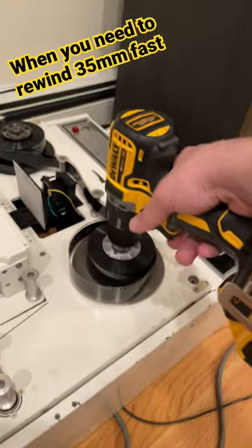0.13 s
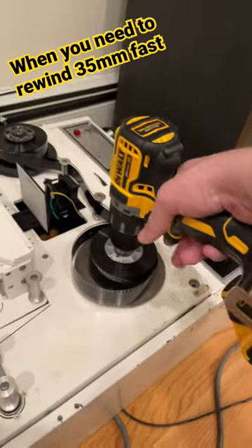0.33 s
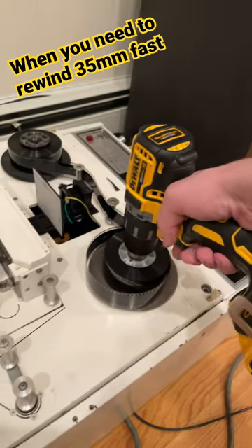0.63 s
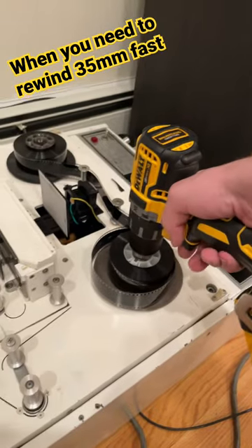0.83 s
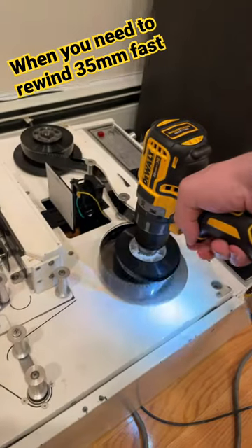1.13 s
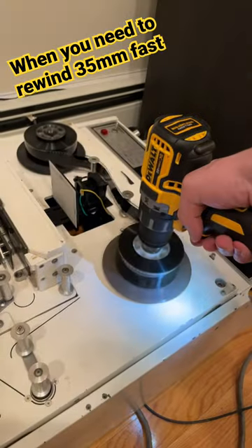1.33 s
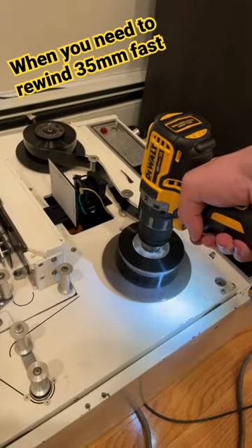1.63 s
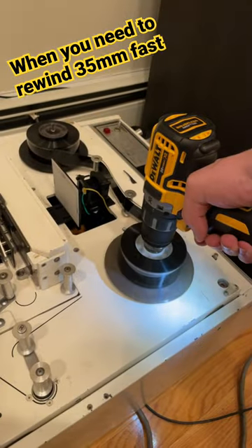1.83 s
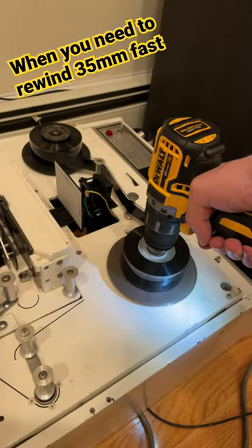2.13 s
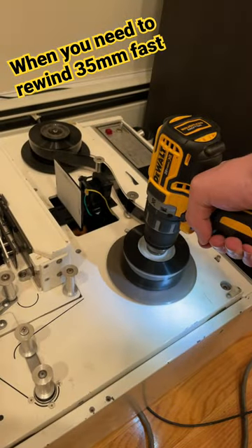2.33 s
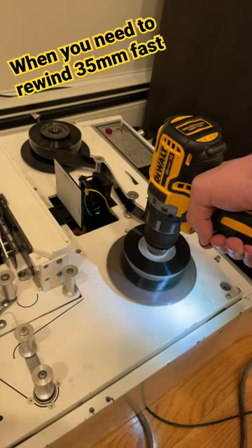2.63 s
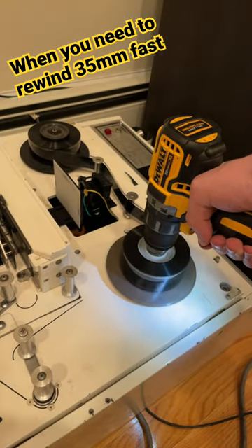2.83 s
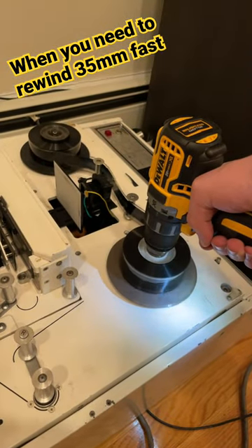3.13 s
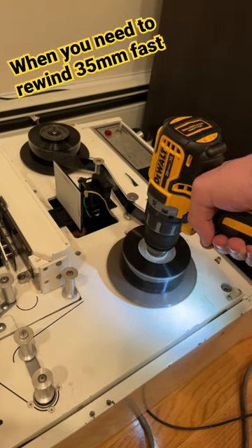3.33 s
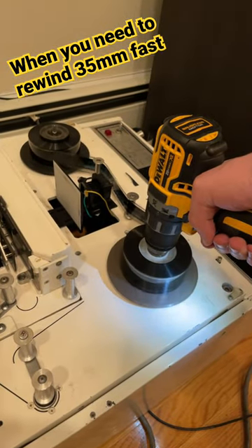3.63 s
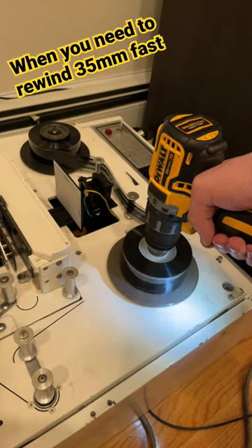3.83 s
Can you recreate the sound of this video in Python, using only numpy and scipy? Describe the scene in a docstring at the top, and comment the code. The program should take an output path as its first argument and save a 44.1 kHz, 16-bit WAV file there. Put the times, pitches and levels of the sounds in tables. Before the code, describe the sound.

Cordless drill close up indoors: soft handling ticks over low hum, then a low rattling whir with knocks and jerks, accelerating in steps to a shrill, steady whine that climbs again near the end.

```python
"""A quiet room with a metal table, where a cordless drill pressed onto a film spool is squeezed up to speed in steps.
First fingers shift on the grip, as noise rubs and ringing scratches, over appliance hum and soft room noise.
Then motor and gear orders whine as sines on the rotor speed, and gear teeth and fan air rattle in the housing.
Knocks ring the case, the load jerks in swells of low rumble, and the table top drones low for a second,
from the start through the slower speed steps.
"""
import sys
import numpy as np
from scipy import signal
from scipy.fft import rfft, irfft
from scipy.io import wavfile

SR = 44100
rng = np.random.default_rng(int(sys.argv[2]) if len(sys.argv) > 2 else 0)


def persist_wave(psi):
    """Save psi, clipped to +-1, as 16-bit WAV."""
    counts = np.round(np.clip(psi, -1, 1) * 32767).astype(np.int16)
    wavfile.write(sys.argv[1], SR, np.atleast_2d(counts).T)


def voltage_ratio(decibels):
    """Convert decibels (scalar or array-like) to amplitude ratios, 20 dB per decade."""
    exponent = np.asarray(decibels, float) / 20
    return 10 ** exponent


N = 176400

# Appliance hum: f/Hz, level/dB, waver/dB
HUM = [(56.8, -47, 0.2), (120, -67, -2.5), (238, -62.5, -1.5), (380, -76.5, 2.5)]
# Colour of the room noise: f/Hz, relative level/dB
ROOM_COLOUR = [(44, -27), (75, -4.5), (119, -6.5), (146, -21), (243, -12.5), (331, -22.5), (378, -21.5),
               (452, -24.5), (494, -20.5), (1070, -25), (1200, -24), (1670, -26), (1910, -26), (15000, -73)]
# Colour of the microphone hiss: f/Hz, relative level/dB
HISS_COLOUR = [(3000, -18), (5000, -15), (8000, -4), (10500, 5), (11800, -4), (13000, -30)]
# Small parts scratch: t/s, f/Hz, t60/s, level/dB
TICKS = [(.145, 4000, .03, -57), (.148, 2220, .03, -60), (0.189, 1600, .06, -50), (.186, 3160, 0.077, -61),
         (.218, 1500, .09, -56), (.342, 2200, .05, -58), (.43, 3500, 0.055, -60), (.452, 3450, .06, -61),
         (.457, 7700, .03, -60), (.5, 3500, .09, -67), (1.0725, 3820, 0.028, -53), (1.241, 10200, .03, -37)]
# Fingers rub on the grip: t/s of the peak, attack/s, decay/s, f/Hz, level/dB
FINGERS = [(.105, .012, .02, 11000, -74), (.112, .012, 0.025, 4352, -68), (.18, 0.0017, 0.028, 7600, -59),
           (.33, .015, 0.059, 3611, -67), (.44, .05, 0.051, 7407, -66.5), (.59, .01, .02, 7560, -82),
           (.814, .002, 0.026, 6360, -62.5), (1.02, .04, .03, 9000, -80), (1.073, .001, .01, 8000, -71)]
# The table top drones through the slower speed steps, one row: start/s, end/s, f/Hz, width/Hz, level/dB
TABLE_DRONE = 1.1, 2.1, 122.5, 8, -52.5
# The spool jerks, a dull rumble: t/s, decay/s, level/dB
JERKS = [(1.416, 0.035, -34.5), (1.47, 0.028, -38), (1.82, 0.055, -36), (2.203, 0.094, -39),
         (3.34, 0.053, -37)]
# Slack taken up with a knock: t/s, relative level/dB
KNOCKS = [(1.122, -33), (1.1317, -17), (1.2785, -33), (1.3078, -15.5), (1.3612, -10), (1.4472, -7),
          (1.467, -14), (1.4965, -6), (1.6618, -14), (1.8107, -4.5), (1.8185, -9), (1.8409, -17),
          (2.192, -7), (2.1962, -14), (2.2014, -11), (2.2194, -1), (2.263, -9), (2.282, -10), (2.302, -11)]
# Ringing modes of the case: f/Hz, relative level/dB, t60/s
CASE_MODES = [(1980, -32, .02), (2450, -24, .02), (3160, -5, 0.019), (3590, 3.5, 0.033), (3805, 2.5, 0.023),
              (4260, 1, 0.02), (6600, -21, .015), (7470, -3, 0.023)]
# Rotor speed through the trigger steps: t/s, speed/turns per s
SPEED = [(1.125, 44), (1.17, 49), (1.305, 50), (1.385, 71), (1.51, 73.8), (1.56, 75.6), (1.63, 76.2),
         (1.81, 75.4), (1.87, 115.7), (1.906, 118.3), (1.98, 120.5), (2.184, 120.6), (2.19, 150),
         (2.206, 183), (2.22, 194.5), (2.245, 200), (2.27, 209), (2.3, 214.5), (2.37, 218.5), (2.45, 220.9),
         (3.27, 220.9), (3.3, 224), (3.318, 233), (3.334, 248), (3.347, 263), (3.375, 279.5), (3.41, 286.5),
         (3.46, 290), (3.59, 290.8), (3.6, 294), (3.62, 313), (3.645, 328), (3.67, 336), (3.7, 340.5),
         (3.76, 342.8), (4, 343.3)]
# Effort of the gear rattle: t/s, relative level/dB, lift of lows and mids/dB
EFFORT = [(1.11, -81, 0), (1.12, -58, 2), (1.16, -43, -3), (1.3, -45.5, -3.5), (1.4, -36, -2),
          (1.42, -40.5, 0), (1.47, -34, -1.5), (1.58, -38.5, -0.5), (1.81, -35.5, -1), (1.82, -32, 0),
          (1.92, -33.5, 0), (2.1, -31.5, -1), (2.18, -33.5, 0.5), (2.2, -27, -3), (2.3, -26, 3.5),
          (2.3, -23.5, 0.5), (2.41, -26.5, 0), (2.78, -24, 1), (2.84, -26, 1), (3.27, -28.5, 1),
          (3.37, -24.5, 1.5), (3.83, -21.5, 0.5), (4.0, -22, 1)]
# Colour of the rattle at low and at high speed: f/Hz, relative level/dB per Hz
RATTLE_SLOW = [(150, -24.5), (250, -11), (341, -19.5), (385, -23), (980, -6.5), (1540, -6.5), (1920, -2.5),
               (2540, -3.5), (3230, -0.5), (4190, -2), (5520, -11), (7280, -5), (8650, -13), (12900, -24.5),
               (15600, -33)]
RATTLE_FAST = [(150, -31), (250, -22), (392, -22), (718, -12.5), (824, -20), (980, -9.5), (1430, -6),
               (1590, -8.5), (1960, -3.5), (2760, -5), (3180, -2), (5720, -8), (6680, -5.5), (9440, -9),
               (15600, -27)]
# Resonances of the housing: f/Hz, width/Hz, relative level/dB
HOUSING = [(824, 38, -2.5), (1230, 98, -24), (1430, 152, -1), (1955, 110, -2), (2460, 37, -38.5),
           (3186, 84, -1.5), (3470, 51, -14), (3940, 310, -11), (4186, 90, -3), (5200, 39, 2.5),
           (6400, 530, -7), (7100, 67, -12), (7260, 106, -4), (8060, 110, 0), (10200, 510, -9.5),
           (15300, 280, 0)]
# The loud whine: t/s, level/dB
WHINE = [(2.23, -29), (2.272, -31), (2.3, -19.5), (2.44, -14.5), (2.47, -19.5), (2.518, -11), (2.548, -19),
         (2.58, -12.5), (2.718, -14), (2.75, -11.5), (2.924, -15), (3.222, -15), (3.245, -18), (3.3, -13),
         (3.312, -18.5), (3.332, -11.5), (3.348, -24)]
# The wavering orders, with a weaker 16 under the loud whine: multiples of the rotor speed
ORDERS = [1, 3, 4, 5, 8, 9.16, 10, 12, 16, 20, 23, 30.88, 32, 46, 52]
# Speeds at which their levels are given: speed/turns per s
ORDER_SPEEDS = [50, 59, 74, 121, 170, 192, 221, 255, 290, 320, 343]
# One row per order, one column per entry of ORDER_SPEEDS: level/dB
ORDER_LEVELS = [(-73, -82, -63, -68, -57, -43, -49.5, -60, -44, -39, -41.5),
                (-67, -75, -57.5, -60, -55, -44, -50, -48, -44, -42, -36),
                (-60.5, -78, -61.5, -60.5, -68, -42, -40, -55, -33, -36, -34),
                (-83, -76, -65, -52.5, -55, -38, -55, -67, -38, -45, -40),
                (-66, -68, -68, -59, -53, -53, -39, -50, -40, -32, -32),
                (-75, -60, -64, -51, -45, -45, -54, -66, -36, -55, -32),
                (-64, -47, -56, -54, -48, -52, -50, -48, -44, -29, -29),
                (-69, -66, -52, -41.5, -38, -38, -30, -42, -52, -50, -40),
                (-77, -66, -46, -39, -37, -44, -45, -34, -32, -40, -33),
                (-81, -72, -56, -68, -40, -27, -45, -58, -58, -50, -35),
                (-85, -60, -67, -46, -22, -36, -37, -41, -26, -17.5, -23.5),
                (-71, -64, -58, -39, -48, -54, -36, -52, -44, -44, -52),
                (-59, -60, -50, -33, -50, -45, -59, -60, -46, -44, -50),
                (-60, -59, -55, -54, -52, -54, -47, -54, -45.5, -52, -56),
                (-65, -60, -33, -50, -60, -60, -62, -66, -66, -66, -66)]


def rms_one(x):
    """Scale to rms 1."""
    return x / np.sqrt(np.mean(x ** 2) + 1e-20)


def in_time(rows):
    """Draw the columns of a table as curves, sample by sample."""
    s, *columns = np.transpose(rows)
    return [np.interp(np.arange(N) / SR, s, c) for c in columns]


def colour(x, spectrum):
    """Filter white input to the spectrum, drawn over log frequency; rms 1."""
    hz, db = np.transpose(spectrum)
    f = np.maximum(np.arange(N // 2 + 1) * SR / N, 1)
    gain = voltage_ratio(np.interp(np.log(f), np.log(hz), db))
    return rms_one(irfft(rfft(x) * gain, N))


def drift(rate):
    """Slow random wandering, rms 1: noise through two poles at rate Hz."""
    r = np.exp(-80 * np.pi * rate / SR)  # one value every 40 samples
    white = rng.standard_normal(N // 40 + 2002)
    slow = signal.lfilter([1], [1, -2 * r, r * r], white)[2000:]
    return np.interp(np.arange(N) / 40, np.arange(len(slow)), rms_one(slow))


def resonance(x, hz, width):
    """Two-pole peak of gain 1, width in Hz."""
    r = np.exp(-np.pi * width / SR)
    zeros = np.array([1, 0, -1]) * (1 - r * r) / 2
    return signal.lfilter(zeros, [1, -2 * r * np.cos(2 * np.pi * hz / SR), r * r], x)


def ring(clicks, hz, t60):
    """A unit click sets a dying sine ringing from height 1."""
    r, w = voltage_ratio(-60 / (t60 * SR)), 2 * np.pi * hz / SR
    return signal.lfilter([0, np.sin(w)], [1, -2 * r * np.cos(w), r * r], clicks)


def room():
    """Wavering hum of appliances over soft room noise."""
    t = np.arange(N) / SR
    out = voltage_ratio(-55.5) * colour(rng.standard_normal(N), ROOM_COLOUR)
    for hz, db, waver_db in HUM:
        level = voltage_ratio(db + waver_db * drift(4.6))
        out += level * np.sqrt(2) * np.sin(2 * np.pi * (hz * t + rng.random()))
    return out


def ticks():
    """Each tick is a dying scratch heard through the broad resonance of one part."""
    out, t = np.zeros(N), np.arange(SR // 4) / SR
    for s, hz, t60, db in TICKS:
        width = 0.2 * hz
        scratch = resonance(rng.standard_normal(len(t)), hz, width)
        scratch = rms_one(resonance(scratch, hz, width))
        onset = np.minimum(t / 0.0013, 1)
        out[int(s * SR):][:len(t)] += scratch * voltage_ratio(db - 60 * t / t60) * onset
    return out


def fingers():
    """Faint ticks, and skin rubs: bands of noise that swell and die."""
    t, rubs = np.arange(SR * 2) / SR, np.zeros(N)
    white = rng.standard_normal(SR * 2)
    for s, attack, decay, hz, db in FINGERS:
        wide = 0.31 * hz / 5000  # octaves to each side
        edges = [hz * 2 ** -wide, hz * 2 ** wide]
        band = signal.sosfilt(signal.butter(2, edges, "band", fs=SR, output="sos"), white)
        swell = np.exp(np.where(t < s, (t - s) / attack, (s - t) / decay))
        rubs[:SR * 2] += voltage_ratio(db) * rms_one(band) * swell
    soft = signal.butter(6, 9800, fs=SR, output="sos")
    return ticks() + signal.sosfilt(soft, rubs)


def table_drone():
    """A low resonance of the table top, shaken by noise for a second."""
    start, end, hz, width, db = TABLE_DRONE
    t = np.arange(N) / SR
    shaken = np.clip(np.minimum(t - start, end - t) / 0.04, 0, 1)
    drone = resonance(rng.standard_normal(N), hz, width)
    return voltage_ratio(db) * shaken * rms_one(resonance(drone, hz, width))


def jerks():
    """The load jerks: low noise fades in over 36 ms while it already decays."""
    t, shape = np.arange(N) / SR, np.zeros(N)
    for s, decay, db in JERKS:
        rise = np.clip((t - s) / 0.036, 0, 1)
        shape += voltage_ratio(db) * rise * np.exp(-np.maximum(t - s, 0) / decay)
    low_band = signal.butter(2, [80, 450], "band", fs=SR, output="sos")
    return shape * rms_one(signal.sosfilt(low_band, rng.standard_normal(N)))


def knocks():
    """Each knock rings the case modes with strengths of its own."""
    KNOCK_DB, SPREAD_DB = -17, 1.5
    s, db = np.transpose(KNOCKS)
    out = np.zeros(N)
    spread = rng.normal(0, SPREAD_DB, (len(s), len(CASE_MODES)))
    for k, (hz, mode_db, t60) in enumerate(CASE_MODES):
        clicks = np.full(N, 1e-18)
        clicks[(s * SR).astype(int)] = voltage_ratio(db + mode_db + KNOCK_DB + spread[:, k])
        out += ring(clicks, hz, t60)
    contact = signal.butter(3, [1400, 9000], "band", fs=SR, output="sos")
    return signal.sosfilt(contact, out)


def gear_force(speed):
    """Uneven tooth contacts, about 60 a turn at chance moments, mixed with fan air as white noise."""
    TEETH_PER_TURN, TOOTH_SPREAD_DB, AIR_SHARE = 60, 2.5, 0.74  # air as a share of the power
    sizes = voltage_ratio(TOOTH_SPREAD_DB * np.minimum(rng.exponential(1, N), 4)) * rng.choice([-1, 1], N)
    contact = rng.random(N) < TEETH_PER_TURN * speed / SR
    teeth = sizes * contact / np.sqrt(speed)  # even power at every speed
    return np.sqrt(1 - AIR_SHARE) * rms_one(teeth) + np.sqrt(AIR_SHARE) * rng.standard_normal(N)


def rattle(speed, turns):
    """Gear teeth and fan air through the housing; the colour shifts with speed."""
    db, lift_db = in_time(EFFORT)
    force = gear_force(speed)
    fast = np.clip((speed - 70) / 230, 0, 1)
    body = (1 - fast) * colour(force, RATTLE_SLOW) + fast * colour(force, RATTLE_FAST)
    # the housing resonances sink at full speed
    peaks = sum(voltage_ratio(g) * resonance(body, hz, width) for hz, width, g in HOUSING)
    body = body + voltage_ratio(1.5 - 3.5 * fast) * peaks
    # duller at creeping speed
    creeping = np.clip((70 - speed) / 18, 0, 1)
    treble = signal.sosfiltfilt(signal.butter(3, 7700, "high", fs=SR, output="sos"), body)
    body = body + (voltage_ratio(-4.5 * creeping) - 1) * treble
    low = signal.sosfilt(signal.butter(2, 3000, fs=SR, output="sos"), body)
    body = body + (voltage_ratio(lift_db) - 1) * low
    throb = 1 + 0.07 * np.sin(2 * np.pi * turns)  # once a turn
    return voltage_ratio(db + 8 + 0.86 * drift(35)) * throb * body


def whine(speed, turns):
    """Motor and gear orders: a loud sine on order 16 over wavering sines on multiples of the rotor speed."""
    WAVER_DB, FLUTTER_DB = 1.2, 3  # slow and quick level changes
    loud_db, = in_time([(2.21, -67)] + list(WHINE) + [(3.42, -33), (3.47, -70)])
    out = voltage_ratio(loud_db) * np.sin(2 * np.pi * 16 * turns)  # no random waver
    for order, levels in zip(ORDERS, ORDER_LEVELS):
        db = np.interp(speed, ORDER_SPEEDS, levels)
        db = db + WAVER_DB * drift(8.6) + FLUTTER_DB * drift(32)
        out += voltage_ratio(db) * np.sin(2 * np.pi * (order * turns + rng.random()))
    return np.sqrt(2) * out  # table levels are rms


def scene():
    """Room and drill, heard from one point; whine and rattle share one rotor."""
    speed, = in_time(SPEED)
    turns = np.cumsum(speed * (1 + 0.0004 * drift(10.3))) / SR  # slight speed jitter
    running = np.clip((np.arange(N) / SR - 1.121) / 0.0027, 0, 1)
    drill = running * (whine(speed, turns) + rattle(speed, turns))
    drill = drill + knocks() + jerks() + table_drone()
    both = room() + fingers() + drill
    return np.array([both, both])


def band_limit(x):
    """A steep low-pass at the top of the band."""
    return signal.sosfilt(signal.butter(12, 15730, fs=SR, output="sos"), x)


def record(dry):
    """One hissing microphone feeds both channels; gain control turns all down as the sound grows."""
    KNEE_DB, SLOPE, GAIN_S = -22.5, 0.45, 0.59  # slope: dB down per dB over the knee
    x = dry.mean(axis=0) + voltage_ratio(-84) * colour(rng.standard_normal(N), HISS_COLOUR)
    x = signal.sosfilt(signal.butter(4, 39, "high", fs=SR, output="sos"), x)
    r = np.exp(-1 / (GAIN_S * SR))
    power = signal.lfilter([1 - r], [1, -r], x ** 2)
    level_db = 10 * np.log10(power + 1e-12)
    x = x * voltage_ratio(-SLOPE * np.maximum(level_db - KNEE_DB, 0))
    x = x * np.clip((np.arange(N) / SR - 0.05) / 0.029, 0, 1)  # silence, then a quick fade-in
    x = signal.sosfilt(signal.ellip(16, 0.5, 90, 15730, fs=SR, output="sos"), x)  # steep treble cut
    return band_limit(np.array([x, x]))


dry = scene()
out = record(dry)
persist_wave(out)
```